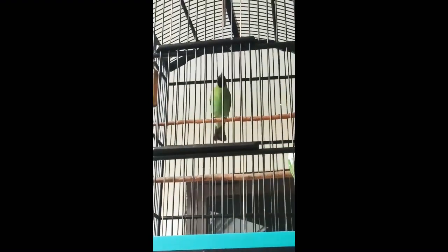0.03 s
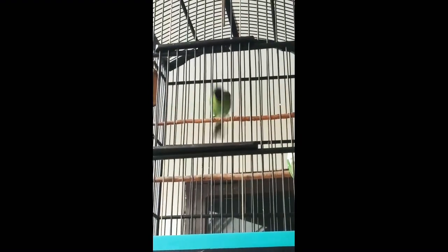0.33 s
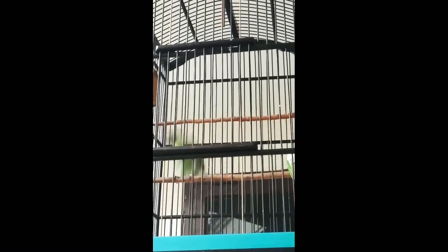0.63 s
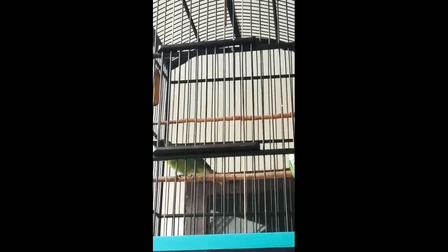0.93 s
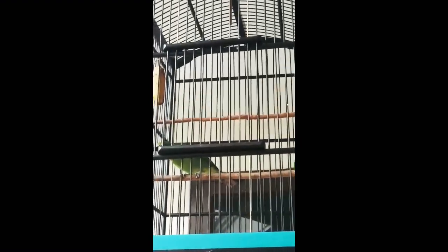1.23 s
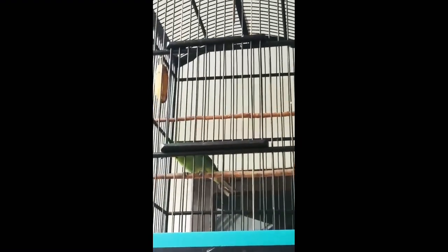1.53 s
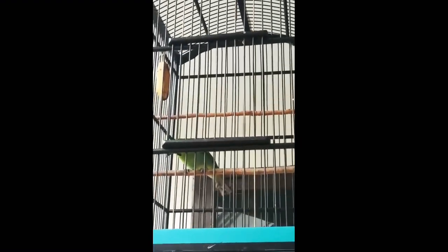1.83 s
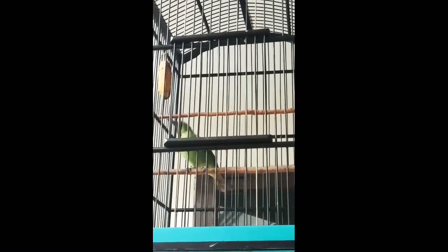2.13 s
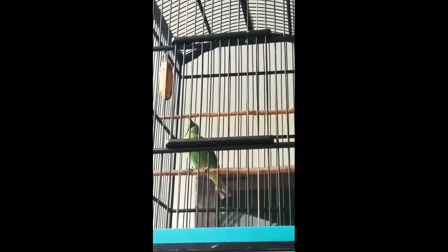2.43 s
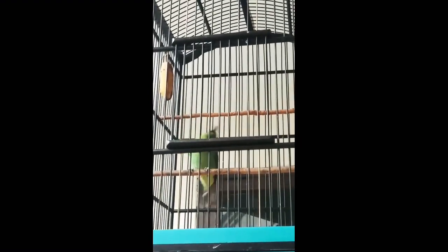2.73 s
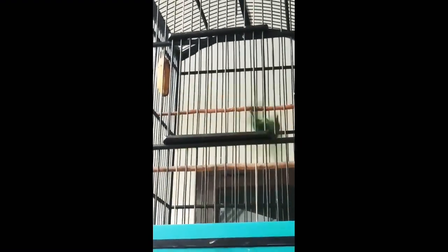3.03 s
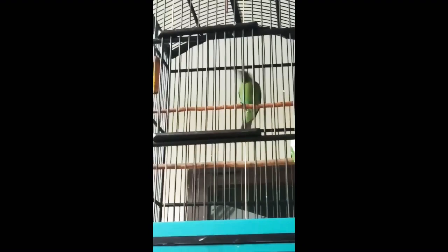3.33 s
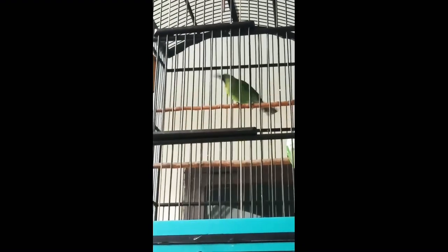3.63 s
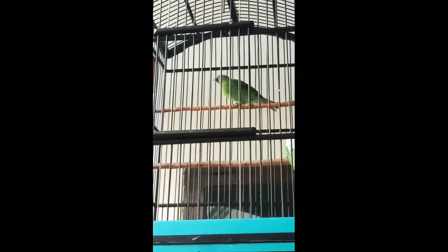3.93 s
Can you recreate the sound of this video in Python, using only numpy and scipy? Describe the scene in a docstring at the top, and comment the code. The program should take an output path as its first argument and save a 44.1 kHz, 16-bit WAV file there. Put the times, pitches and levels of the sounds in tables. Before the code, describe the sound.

A small caged songbird gives a run of rising whistles from about 0.3 to 0.8 seconds. Three lower warbled chirps follow near 1.4, 1.8 and 2.2 seconds, then a shrill double chip at 3.2 and a short harsh rasp at 3.8. Faint ticks and feather rustles fall between the calls as the bird moves. The porch walls add a short echo, and a steady outdoor hiss runs throughout.

```python
"""A porch, where a small caged songbird gives rising whistles, three low warbled chirps, a shrill
double chip and a rasp. Its notes are gliding tones coloured by throat and beak; the rasp is noise
around a squeak. Faint, short ticks and feather rustles come as the bird moves. The walls echo, a
steady outdoor hiss lies behind, and an automatic gain control turns the loudest notes down."""
import sys
import numpy as np
from scipy import signal
from scipy.fft import rfft, irfft, next_fast_len
from scipy.io import wavfile
from scipy.ndimage import uniform_filter1d, map_coordinates

SR = 44100
rng = np.random.default_rng(int(sys.argv[2]) if len(sys.argv) > 2 else 0)


def log_audio(samples):
    """Write samples as a 16-bit WAV file to the path given in sys.argv[1]."""
    # one column per channel
    frames = np.atleast_2d(samples).T
    # limit to full scale, then quantise
    limited = np.clip(frames, -1, 1)
    pcm = np.round(limited * 32767).astype(np.int16)
    wavfile.write(sys.argv[1], SR, pcm)


N = 176400

# a whistle's overtones: multiple of the pitch, relative level/dB
OVERTONES = [(2, -1), (3, -6), (4, -11.5), (5, -9)]
ATTACK_S, RELEASE_S = 0.0059, 0.0064  # a note's soft start and end
WAVER_PER_S = 550  # how fast a whistle's pitch trembles


def amp(db):
    """Turn decibels into a gain."""
    return 10 ** (np.asarray(db) / 20)


def unit(x):
    """Scale a signal to an average power of 1."""
    return x / np.sqrt(np.mean(x ** 2) + 1e-20)


def fade(t, t60):
    """Die away by 60 dB every t60 seconds."""
    return np.exp(-np.log(1000) * t / t60)


def along(points, hz):
    """Read between (f/Hz, value) points on a log frequency axis."""
    f, values = np.transpose(points)
    return np.interp(np.log(hz + 1), np.log(f + 1), values)


def wobble(rate):
    """A smooth curve through `rate` random values a second."""
    return map_coordinates(rng.standard_normal(N // 20), [np.arange(N) * rate / SR], mode="wrap")


def filtered(x, response):
    """Scale each frequency in x by response(hz)."""
    size = next_fast_len(N + SR // 2)
    return irfft(rfft(x, size) * response(np.fft.rfftfreq(size, 1 / SR)), size)[:N]


def noise(spectrum):
    """Noise of power 1 with the given tone colour."""
    return unit(filtered(rng.standard_normal(N), lambda hz: amp(along(spectrum, hz))))


def add(out, start_s, x):
    """Mix x into out at start_s."""
    part = out[round(start_s * SR):][:len(x)]
    part += x[:len(part)]


def outdoor_hiss():
    """A steady hiss whose colour and loudness drift a little; near 1.1 s it swells briefly as the bird's wings
    flutter."""
    # colour of the hiss: f/Hz, relative level/dB
    spectrum = [(15, -70), (25, -40), (48, -43), (66, -20), (96, -18.5), (119, -9), (148, -7), (198, -4),
                (305, -2), (349, -3.5), (433, -2.5), (537, -3.5), (826, -2), (895, -2), (1080, -2.5),
                (1490, -4.5), (1950, -4), (2360, 3.5), (3260, -11.5), (4500, -8.5), (5280, -13), (6550, -8),
                (7910, -19.5), (10400, -16), (15500, -32.5)]
    # its slow rise and fall, with a brief swell near 1.1 s as the wings flutter: t/s, level/dB
    levels = [(0, -35.5), (.9, -36.5), (1.1, -34.5), (1.3, -36.5), (2.1, -37), (2.7, -36), (3.1, -36.5),
              (3.6, -35.5), (4, -36)]
    patch_db, drift_db = 0.94, 0.45
    bands = signal.stft(noise(spectrum), nperseg=512)[2]
    patches = uniform_filter1d(rng.standard_normal(bands.shape), 6, axis=0)  # smooth over frequency
    patches = uniform_filter1d(patches, 14, axis=1)  # and over time
    hiss = signal.istft(bands * amp(patch_db * unit(patches)), nperseg=512)[1][:N]
    level_db = np.interp(np.arange(N) / SR, *np.transpose(levels))
    return unit(hiss) * amp(level_db + drift_db * wobble(8))


def porch_echo(x):
    """The sound arrives directly, then bounces off the walls and blurs into a fading tail."""
    # echoes from the walls: delay/s, level/dB
    walls = [(.0045, -15.5), (0.0107, -5), (.047, -20)]
    # how long the porch rings: f/Hz, time to fall 60 dB/s
    ring_times = [(500, 1), (2300, 0.45), (4000, 0.47), (7000, .42), (14000, 0.36)]
    tail_db, build_s = -4.5, 0.014
    hz, t, bands = signal.stft(rng.standard_normal(SR), SR, nperseg=256)
    bands = bands * fade(t, along(ring_times, hz)[:, None]) * (1 - np.exp(-t / build_s))
    tail = signal.istft(bands, SR, nperseg=256)[1]
    out = x + amp(tail_db) * signal.fftconvolve(x, tail / np.linalg.norm(tail))[:N]
    for delay, db in walls:
        add(out, delay, amp(db) * x)
    return out


def ticks_and_rustles():
    """Faint, short ticks and feather rustles as the bird moves, each a quickly fading burst of noise."""
    # bursts: t/s, level/dB
    bursts = [(0.593, -39), (1.067, -36), (1.095, -38), (1.19, -37), (2.36, -38), (3.103, -34),
              (3.133, -36)]
    # their colour: f/Hz, relative level/dB
    spectrum = [(300, -15), (1000, 4), (4000, 4), (7000, 1), (10000, -2), (15000, -19)]
    envelope, t = np.zeros(N), np.arange(SR // 4) / SR
    for start, db in bursts:
        add(envelope, start, amp(db) * fade(t, t60=0.05))
    return envelope * noise(spectrum)


def voice(hz, partials):
    """The bird's tone: partials (sine waves at multiples of the pitch) coloured by throat and beak."""
    # colour from throat and beak: f/Hz, gain/dB
    beak = [(3000, -2.5), (5000, 0.5), (6500, -4.5), (8000, -8.5), (9900, 1.5), (11200, 0), (12300, -17),
            (15000, -3)]
    phase = 2 * np.pi * np.cumsum(hz) / SR
    tone = np.zeros(len(hz))
    for k, db in partials:
        gain = amp(db + along(beak, k * np.abs(hz)))
        tone += gain * np.sin(k * phase) * (k * hz < SR / 2)
    return np.sqrt(2) * tone


def note(row, partials, bend):
    """One soft-edged note that glides through three pitches while `bend` makes it tremble."""
    start, length, first, middle, last, db = row
    t = np.arange(int(length * SR)) / SR
    glide = np.polyval(np.polyfit([0, 0.5, 1], [first, middle, last], 2), t / length)
    hz = glide * (1 + bend[round(start * SR):][:len(t)])
    attack = np.sin(np.pi / 2 * np.clip(t / ATTACK_S, 0, 1)) ** 2
    release = np.sin(np.pi / 2 * np.clip((length - t) / RELEASE_S, 0, 1)) ** 2
    return amp(db) * attack * release * voice(hz, partials)


def rasp():
    """A harsh, rattling burst of noise around a rough rising squeak."""
    # colour of the burst: f/Hz, relative level/dB
    spectrum = [(1500, -26), (2500, 5), (4000, -5), (5500, -0.5), (7300, 0.5), (8500, -19), (10500, -5.5),
                (13000, -24), (15500, -24)]
    # the squeak's notes: t/s, length/s, first f/Hz, middle f/Hz, last f/Hz, base level/dB
    squeaks = [(3.783, 0.0242, 2343, 2566, 3100, -27.5), (3.804, 0.042, 3450, 3730, 3950, -36)]
    # their partials: multiple of the pitch, relative level/dB
    partials = [(1, 0), (2, -13), (3, -24)]
    start_s, attack_s, hold_s = 3.775, 0.0039, 0.028
    burst_db, rattle_db = -32, 1.5
    t = np.arange(N) / SR - start_s
    envelope = np.clip(t / attack_s, 0, 1) * fade(np.maximum(t - hold_s, 0), t60=0.2)
    rattle = unit(noise(spectrum) * amp(rattle_db * wobble(500)))
    out = amp(burst_db) * envelope * rattle
    bend = 0.035 * wobble(900)
    for row in squeaks:
        add(out, row[0], note(row, partials, bend))
    return out


def chips():
    """Shrill, fluttering notes, strongest at twice their pitch; the two sides of the throat overlap."""
    # notes: t/s, length/s, first f/Hz, middle f/Hz, last f/Hz, base level/dB, side partial boost/dB
    notes = [(3.212, .016, 3080, 3100, 3050, -31, 13), (3.223, 0.011, 3040, 3254, 3440, -18.5, 12),
             (3.228, 0.022, 3330, 3340, 3280, -16.5, 0), (3.260, 0.022, 3290, 3350, 3260, -18, -3),
             (3.264, 0.028, 3486, 3545, 3430, -18.5, 3), (3.284, 0.016, 3410, 3150, 2940, -21, -1)]
    # the weaker side partials: multiple of the pitch, relative level/dB
    side_partials = [(1, -26), (3, -27), (4, -22)]
    trill_hz, trill_depth, roughness = 330, 0.013, 0.016
    trill = trill_depth * np.sin(2 * np.pi * trill_hz * np.arange(N) / SR)
    bend = trill + roughness * wobble(700)
    out = np.zeros(N)
    for *row, side_db in notes:
        partials = [(2, 0)] + [(k, db + side_db) for k, db in side_partials]
        add(out, row[0], note(row, partials, bend))
    return out


def opening_whistle():
    """A held whistle that scoops up, then swells and turns pure."""
    # the whistle's path: t/s, f/Hz, base level/dB, overtone boost/dB
    path = [(.295, 2224, -29, -12), (.305, 2397, -29.5, -13), (.316, 2511, -30.5, -17),
            (0.339, 2505, -21.5, -10.5), (.354, 2508, -26, -40), (.370, 2523, -14.5, -44),
            (.392, 2550, -24, -42), (.409, 2720, -12.5, -38)]
    times, *columns = np.transpose(path)
    t = np.arange(N) / SR
    hz, level_db, bright_db = [np.interp(t, times, column) for column in columns]
    envelope = np.clip((t - times[0]) / ATTACK_S, 0, 1) * np.clip((times[-1] - t) / RELEASE_S, 0, 1)
    bend = 0.0016 * wobble(WAVER_PER_S)
    partials = [(1, 0)] + [(k, db + bright_db) for k, db in OVERTONES]
    return envelope * amp(level_db) * voice(hz * (1 + bend), partials)


def whistles():
    """Short gliding whistles and low, throaty chirps; rough ones flutter in pitch and loudness."""
    # notes: t/s, length/s, first f/Hz, middle f/Hz, last f/Hz, base level/dB, overtone boost/dB,
    # roughness as a share of the pitch
    notes = [ (0.404, 0.077, 2630, 2596, 2680, -30, -38, 0.01),
             (.410, 0.025, 2930, 3054, 3030, -25.5, -28, 0.05),
             (0.416, 0.06, 3256, 3216, 3400, -26.5, -15.5, 0.01),
             (0.48, 0.027, 3440, 3540, 3660, -35, -17, 0.02),
             (.570, 0.0165, 3440, 3670, 3750, -34, -2, 0.1),
             (.585, 0.032, 3734, 3767, 3790, -26.5, -21, 0.02),
             (0.707, 0.061, 3674, 3826, 3770, -39.5, -9, 0.03),
             (.785, 0.053, 3830, 3900, 3820, -46, -24, 0),
             (1.332, 0.028, 2650, 2694, 2560, -22.5, -32, 0.03),
             (1.353, .024, 2650, 2610, 2480, -19.5, -39, 0.03),
             (1.418, 0.012, 1700, 1710, 1800, -35, -30, .03),
             (1.440, .034, 2072, 2487, 2590, -17, -39, 0.03),
             (1.512, 0.017, 1710, 1650, 1590, -32.5, -30, 0.07),
             (1.722, 0.019, 2440, 2230, 1960, -25.5, -34, 0.03),
             (1.755, 0.037, 1605, 1735, 2130, -34.5, -30, 0.05),
             (1.789, 0.0167, 1957, 2280, 2380, -18.5, -36, 0.04),
             (1.805, 0.025, 2114, 2307, 2280, -18.5, -41, 0.02),
             (1.829, 0.023, 2286, 2160, 1970, -23.5, -30, .06),
             (1.854, 0.013, 2220, 2290, 2240, -22, -32, .03),
             (2.177, 0.038, 2196, 1815, 1820, -34, -18, 0.07),
             (2.201, 0.028, 2290, 2232, 1860, -24, -24, 0.04),
             (2.236, 0.0366, 1720, 1840, 1910, -25.5, -39, 0.05),
             (2.237, 0.029, 2225, 2180, 2120, -32, -32, 0.06),
             (2.277, .016, 2130, 2335, 1900, -13.5, -50, .02),
             (3.223, 0.0186, 2000, 2636, 3170, -32.5, -13, 0.09)]
    out = np.zeros(N)
    pitch_flutter, loudness_flutter = wobble(WAVER_PER_S), wobble(500)
    for *row, bright_db, roughness in notes:
        partials = [(1, 0)] + [(k, db + bright_db) for k, db in OVERTONES]
        tone = note(row, partials, roughness * pitch_flutter)
        start, depth = row[0], 3.2 * roughness
        rattle = 1 + depth * loudness_flutter[round(start * SR):][:len(tone)]
        add(out, start, tone * rattle / np.hypot(1, depth))  # keeps the power about the same
    return out


def scene():
    """The bird on its porch over the hiss, alike in both channels."""
    mono = porch_echo(opening_whistle() + chips() + ticks_and_rustles())
    mono += porch_echo(whistles() + rasp())
    mono += outdoor_hiss()
    return np.array([mono, mono])


def record(dry):
    """A quick gain control turns loud notes down, and the very highest treble is cut off."""
    threshold_db, squeeze = -30, 0.3  # squeeze: dB taken off for each dB over the threshold
    sense_s, smooth_s, top_hz = 0.0089, 0.0067, 15600
    power = np.abs(uniform_filter1d(dry[0] ** 2, int(sense_s * SR)))
    over_db = np.maximum(10 * np.log10(power + 1e-12) - threshold_db, 0)
    memory = np.exp(-1 / (smooth_s * SR))
    gain = amp(-squeeze * signal.lfilter([1 - memory], [1, -memory], over_db))
    return np.array([filtered(side * gain, lambda hz: hz < top_hz) for side in dry])


dry = scene()
out = record(dry)
log_audio(out)
```